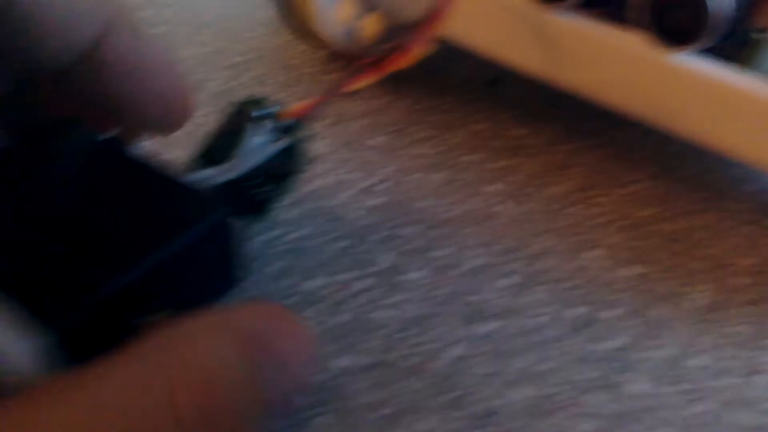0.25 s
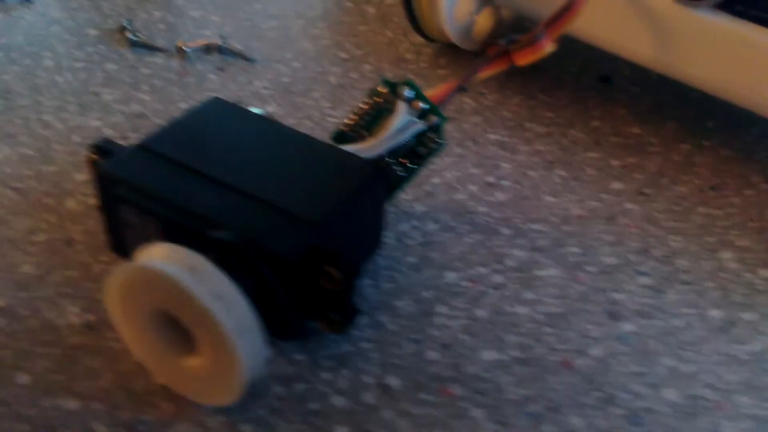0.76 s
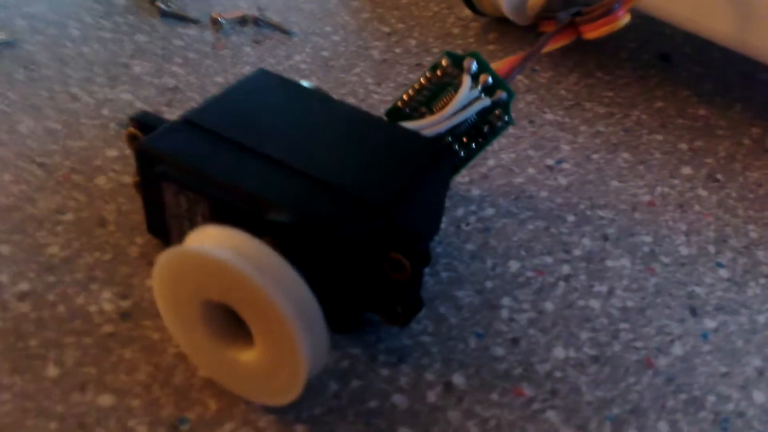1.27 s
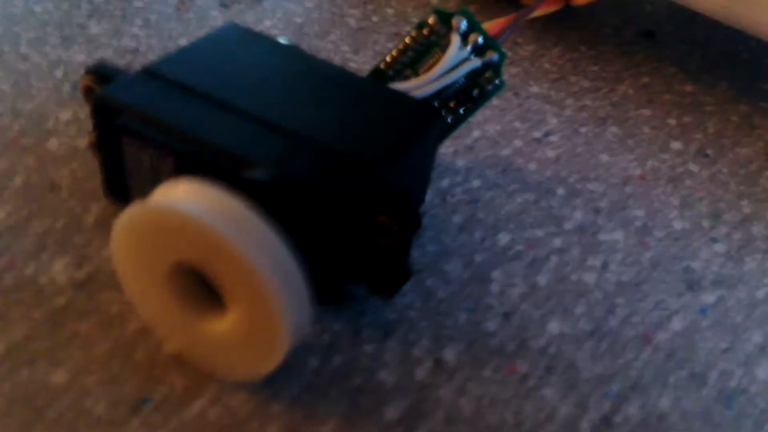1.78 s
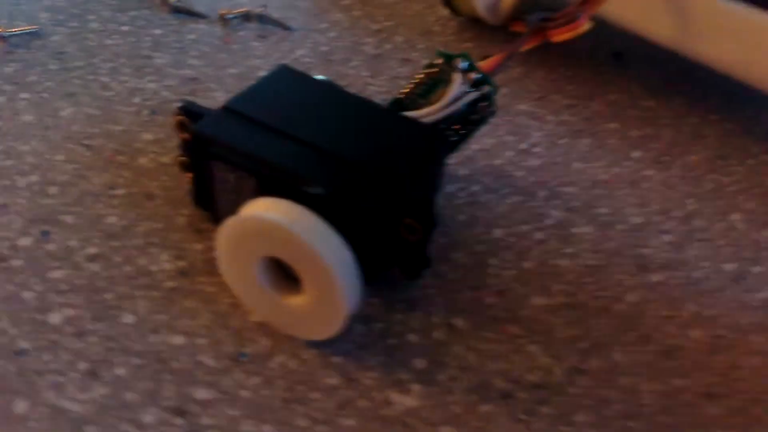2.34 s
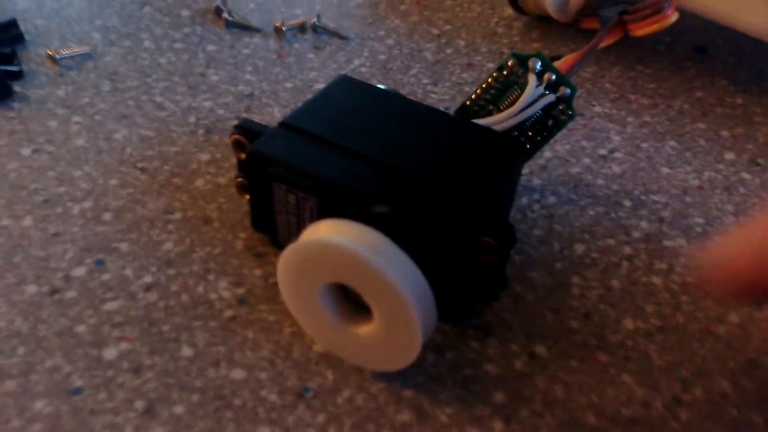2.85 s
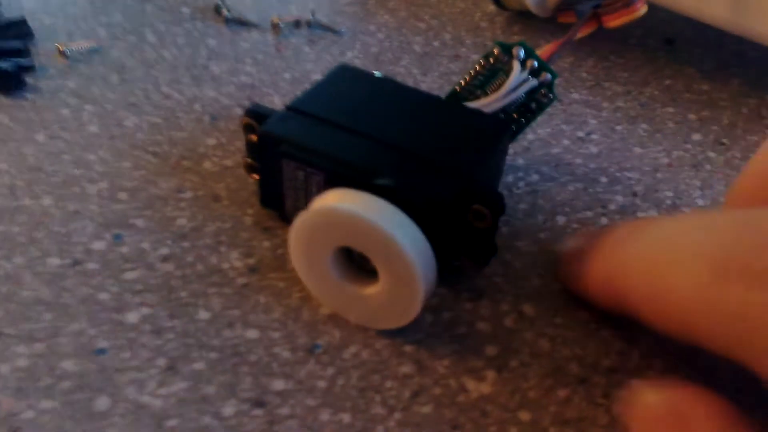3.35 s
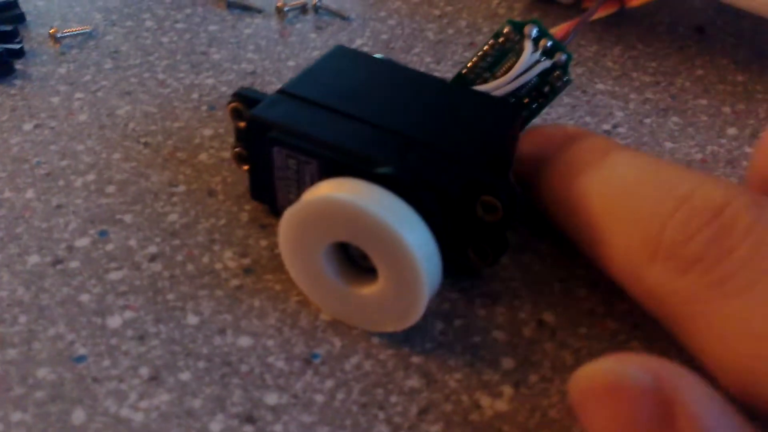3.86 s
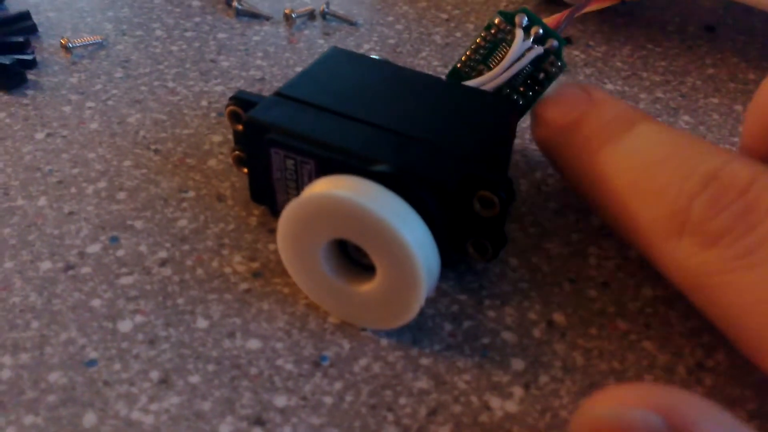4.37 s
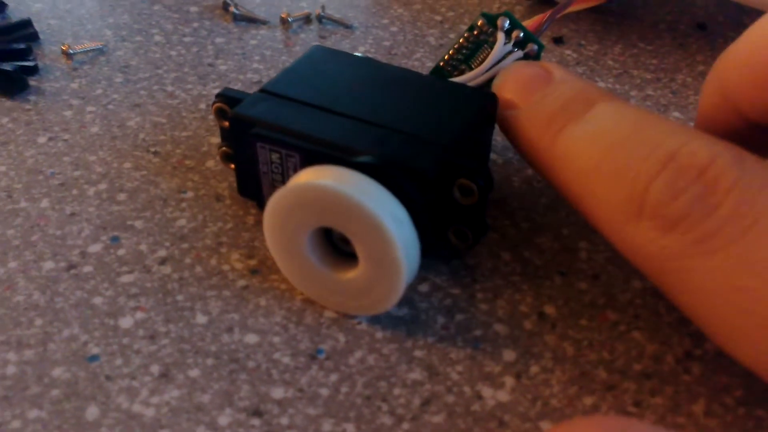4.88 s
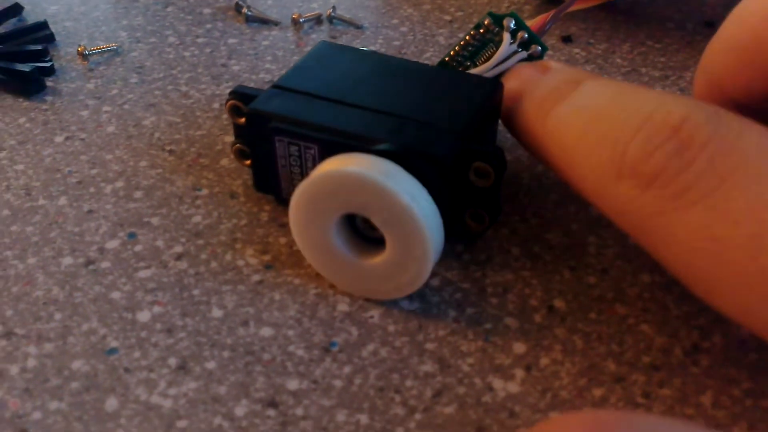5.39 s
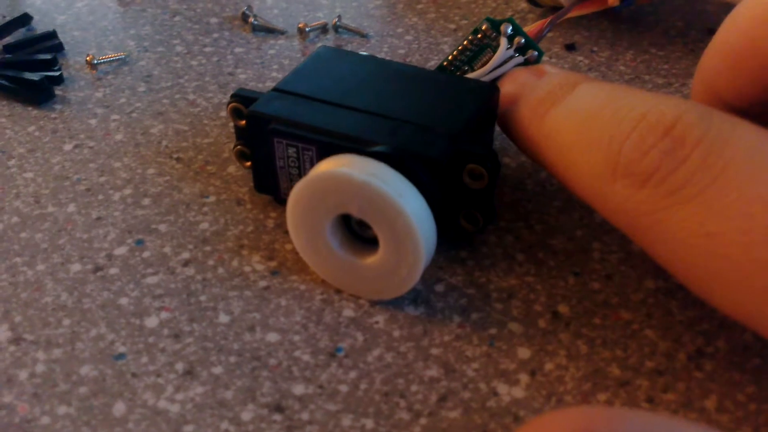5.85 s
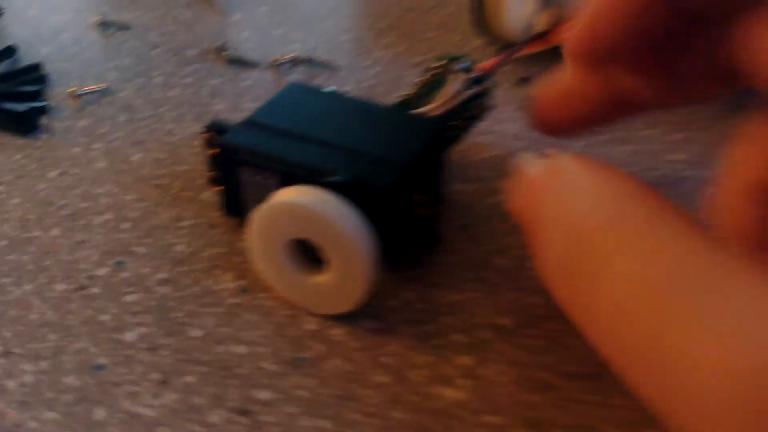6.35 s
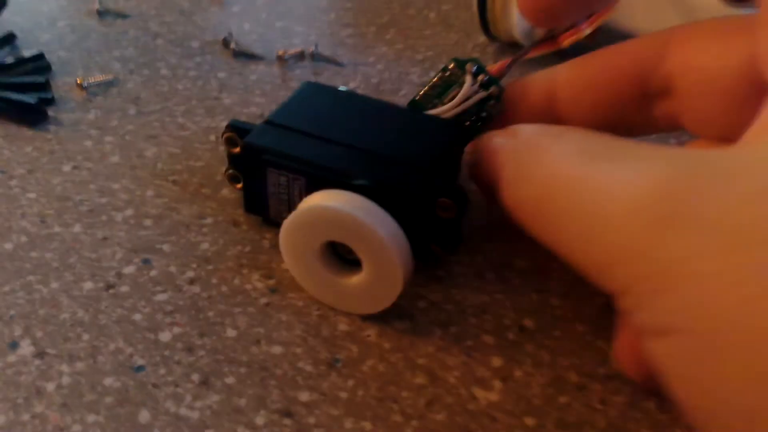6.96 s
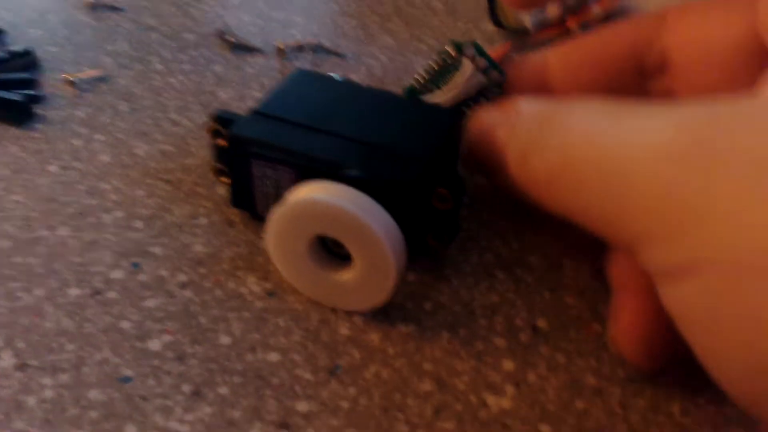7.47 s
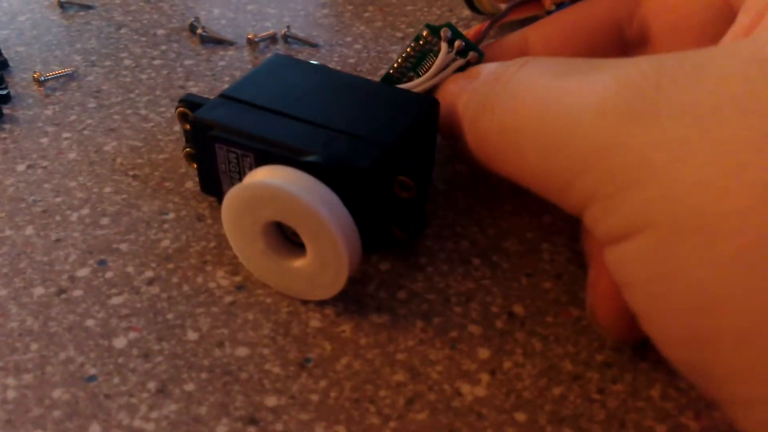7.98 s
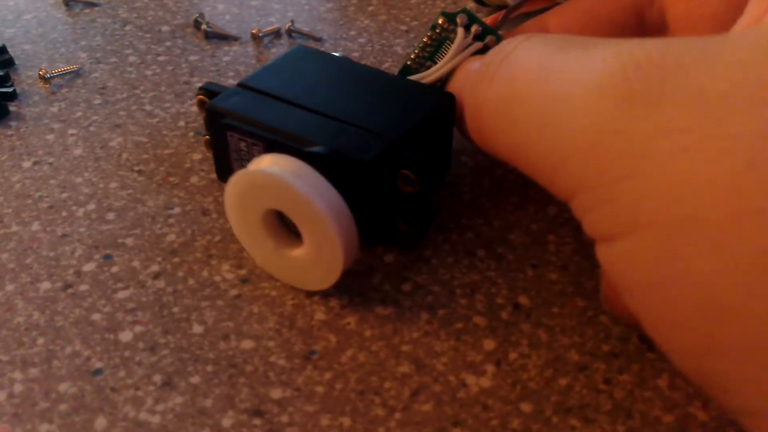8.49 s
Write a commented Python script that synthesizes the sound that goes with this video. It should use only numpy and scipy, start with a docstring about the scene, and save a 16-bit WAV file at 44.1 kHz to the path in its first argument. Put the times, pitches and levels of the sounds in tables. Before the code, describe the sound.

From the start a small hobby servo runs very close by: a loud metallic rattle and gritty grind, with hard irregular clacks, over a bright, hissy whine made of hundreds of tooth ticks a second. An off-centre gear makes it throb about twelve times a second. Clacks are densest from 0.4 to 1.1 seconds. Soft knocks come near 1.3 and 1.8, then bumps and scuffs from 2.0 lead to a sharp double click at 2.14. The loud rattle drops at once. A lighter, fluttering ticking whirr continues, mostly slowing to about seven pulses a second. Small snaps stand out near 3.8, 5.8, 6.5 and 8.0. Soft finger touches land around 4.5 and 6.4, with faint scuffs to 6.7 and near 8.0; the case sings slightly under pressure, strongest around 7. Faint bench murmur, short dry reflections, still running at 8.7.

```python
"""A loud metallic rattle and grind over a bright ticking whine: a small geared servo on a bench, mostly slowing.
Meshing teeth tick hundreds of times a second; an off-centre gear binds once a turn, so the whine swells and sags.
Loose teeth strike and ring the case, whose modes slide with the strain; bumps and a sharp click end the loud rattle.
A lighter rattle follows, with snapping teeth, finger touches and scuffs, over motor whirr, bench murmur and hum.
Strikes are noise bursts through resonators; steady sounds are filtered noise or sines, with short echoes added."""
import sys
import numpy as np
from scipy import signal
from scipy.fft import rfft, irfft, next_fast_len
from scipy.io import wavfile
from scipy.ndimage import uniform_filter1d

SR = 44100
rng = np.random.default_rng(int(sys.argv[2]) if len(sys.argv) > 2 else 0)


def generate_wav(signal):
    """Clip the signal to [-1, 1] and save it as 16-bit WAV at the path in sys.argv[1]."""
    frames = np.transpose(np.atleast_2d(signal))
    scaled = np.clip(frames, -1, 1) * 32767
    pcm = np.round(scaled).astype(np.int16)
    wavfile.write(sys.argv[1], SR, pcm)


N = 384993
TIME = np.arange(N) / SR

# Levels in the tables are relative unless said otherwise; pan is left minus right.
# steady hum in the room: pitch_hz, level_db
HUM = [(88.3, -90), (220.7, -82), (397, -84.5), (543.7, -83.5), (899, -83.5)]
# colour of the murmur in bench and room: frequency_hz, level_db
ROOM = [(24, -48), (40, -30), (59, -45), (80, -7), (166, -5.5), (216, -3), (267, -1), (402, 0.5),
        (466, -2.5), (531, 1.5), (749, -5), (897, -0.5), (1150, -14.5), (2000, -24), (2600, -40),
        (4400, -120)]
# faint drone of the bench: pitch_hz, width_hz, level_db
DRONE_MODES = [(221.3, 11.5, -0.5), (404, 31, -3.5), (607, 120, -8.5), (890, 15, -3), (1301, 34, -3),
               (1765, 21, -9)]
BENCH_DB, BENCH_WAVER_DB = -66.5, 2
# colour of the motor whirr: frequency_hz, level_db
WHIRR = [(500, -16), (1200, -6.5), (1800, -9), (2350, -1), (2900, -3), (3400, -7), (4200, -6.5),
         (6000, -10), (12000, -55.5)]
WHIRR_DB, WHIRR_FADE_DB_PER_S, WHIRR_SWELL_DB = -60, 0.43, 3.5

# a fingertip lands: start_s, level_db, decay_s
TOUCHES = [(4.461, -51, 0.014), (4.584, -59.5, 0.022), (6.445, -56, 0.024)]
# the servo knocking on the bench: pitch_hz, width_hz, level_db
TOUCH_MODES = [(210, 70, 2), (410, 130, 1), (605, 120, -3.5), (888, 46, 6), (1290, 110, -2),
               (1710, 300, -14)]
# handling bumps: start_s, level_db, pitch_hz, rise_cycles
BUMPS = [(1.234, -41.5, 530, 0.21), (1.364, -46, 380, 0.33), (1.783, -36, 540, 0.62),
         (1.822, -37.5, 170, 0.34), (2.015, -40, 700, 0.28), (2.057, -35, 925, 0.22),
         (2.06, -46, 218, 0.44), (2.0724, -37.5, 200, 0.23), (2.1385, -29, 560, 0.48),
         (2.14, -36, 302, 0.4), (2.143, -46.5, 135, 0.5)]
BUMP_LOW_CUT_HZ = 90
# plastic scuffs: start_s, level_db, decay_s
SCUFFS = [(2.0561, -36, .0014), (2.071, -40.5, 0.0033), (2.104, -44, 0.019), (2.124, -42, 0.0045),
          (2.131, -35.5, 0.0025), (2.136, -28.5, 0.0021), (6.423, -48, 0.0037), (6.458, -54, 0.0073),
          (6.722, -52, 0.012), (7.986, -51, 0.0036)]
# colour of scuffed plastic: frequency_hz, level_db
PLASTIC = [(60, -25), (250, 0), (450, 10), (650, 1), (1000, 3), (1400, 1.5), (2000, -3), (3000, 0),
           (4200, -2), (5500, 3), (8000, -5), (15000, -31)]
# the slip clicks home in a double crack: start_s, level_db
CRACKS = [(2.1372, -16.5), (2.1387, -13.5)]
# the cracking plastic: pitch_hz, width_hz, level_db
CRACK_MODES = [(497, 180, -2), (800, 260, -1.5), (1400, 430, 1.5), (2120, 500, -2.5), (3240, 500, -6),
               (4280, 580, 7.5), (5500, 1300, 4), (7300, 1500, -2)]

TEETH = 47
FIRST_TIGHT_TURNS = .154
# speed of the off-centre gear: time_s, speed_turns_per_s
SPEED = [(0, 12.825), (1.4, 10.834), (4.5, 8.962), (4.9, 8.296), (7.4, 7.319), (7.6, 7.86), (8.73, 7.319)]
# force on the teeth: time_s, tight_spot_level_db, slack_side_drop_db
LOAD = [(0, -45.5, 5.5), (.41, -46, 6), (.7, -51, 7), (.95, -44.5, 5.5), (1.42, -55.5, -0.5),
        (1.68, -43, 8), (2.4, -42, 6.5), (3.0, -42.5, 3), (3.8, -41, 8), (4.05, -45, 5.5), (4.3, -43.5, 6),
        (5.6, -45, 6.5), (6.2, -48, 5.5), (6.58, -54.5, 1), (6.9, -50.5, 2.5), (7.5, -52, -1),
        (7.63, -50.5, 2), (7.9, -42.5, 17), (8.15, -49.5, 7), (8.4, -52, 3.5), (8.73, -54, 2)]
# rattle of the loose teeth at the tight spot, which drops at the click: time_s, level_db
LOOSENESS = [(0, -35), (.25, -37), (.42, -35.5), (.9, -35.5), (1.2, -34.5), (1.75, -36), (2.12, -38),
             (2.2, -47.5), (2.7, -50), (3.05, -46.5), (3.85, -48.5), (4.1, -50.5), (5.9, -51), (6.35, -54),
             (6.6, -49.5), (7.3, -48), (7.95, -50.5), (8.5, -52.5)]
# brief grinding swells added to the rattle: centre_s, half_length_s, rise_db
GRINDS = [(0.335, 0.041, 4.5), (0.41, 0.016, 7.5), (0.667, 0.019, 6.5), (0.74, 0.015, 2.5),
          (0.925, 0.031, 3.5), (1.345, 0.025, 2), (1.65, 0.012, 4.5), (1.835, 0.016, 2), (2.425, 0.035, 2),
          (2.98, 0.03, 3), (3.085, 0.025, 3), (3.84, 0.016, 4), (4.25, 0.033, 2), (4.38, 0.022, 1),
          (4.48, 0.025, 4), (6.07, 0.02, 5), (6.19, 0.013, 4), (6.335, 0.043, 8.5), (6.46, 0.03, 6),
          (6.56, .02, 3), (6.715, .025, 1.5), (6.835, .03, 3.5), (6.985, 0.026, 2), (7.14, .015, 0),
          (7.25, 0.027, -1), (7.635, 0.02, 5.5), (7.78, 0.022, 4.5), (7.915, 0.024, 7), (8.045, .02, 3),
          (8.195, 0.021, 5)]
# tone of the gears: time_s, mesh_sheen_db, upper_case_mode_db
TONE = [(0, 4, -7), (.5, 3.5, -29), (1.3, 1, -8.5), (2.15, -5, -5), (3.3, -3, -20), (3.9, -5, -6),
        (4.5, -5, -4), (5.2, -5, -27), (7.3, -1, -13), (8.4, -7, -13)]
# where the servo sits as the microphone shifts: time_s, rattle_pan_db
PLACE = [(0, -6), (1.1, -8), (2.0, -6), (3.0, -9), (4.5, -10), (6.0, -7), (6.55, 1), (7.3, -1), (8.73, 0)]
# fingers press on the case: centre_s, half_length_s, firmness (0-1)
GRIPS = [(4.6, 0.61, 0.4), (5.6, 0.96, 0.58), (6.5, 0.31, 0.66), (7.1, 0.43, 1)]
RATTLE_EASE_DB = 2.5   # drop on the slack side
SETTLED_RATTLE_DB = -55   # upper limit on the rattle curve that sets the light snaps
MESH_BIND_POWER, RATTLE_BIND_POWER = 1.83, 1.3   # the higher, the briefer the tight spot
MESH_PAN_DB, MESH_PAN_GRIP_DB = 12.5, 4   # the mesh sits left, more so under the fingers

# colour of the mesh: frequency_hz, level_db
MESH = [(1000, -28), (3500, -22), (5500, -9.5), (7800, -8), (9000, -3.5), (10150, -1), (11000, -1),
        (12300, -0.5), (13300, -9), (14500, -2.5), (16000, -22)]
# two drifting resonances of the whine: time_s, lower_pitch_hz, upper_pitch_hz
WHINE_PEAKS = [(0, 10000, 11750), (1, 10000, 12150), (2.6, 9900, 12250), (3.4, 10000, 12350),
               (4.3, 10300, 12000), (5.3, 10550, 11750), (6.8, 10950, 12200), (7.9, 11500, 12100),
               (8.73, 10400, 11700)]
WHINE_WIDTH_HZ, WHINE_PEAK_DB = 1000, -4.5
# ring of the gear case: pitch_hz, width_hz, level_db
CASE_MODES = [(4320, 530, -16.5), (4720, 460, -9), (5064, 368, -4), (5730, 540, -5.5), (6520, 920, -4),
              (7150, 450, 3), (7620, 500, -5.5), (8550, 640, -13.5), (10000, 680, -26), (12000, 5600, -30)]
# strain bends the case modes: time_s, low_bend_semitones, high_bend_semitones, high_level_db
CASE_BEND = [(0, -0.8, 0.16, -1), (0.28, -0.88, 0.24, 0.5), (0.38, -0.2, -0.28, -3.5),
             (1.1, -0.22, 0.088, -1), (1.55, 0, 0.14, -0.5), (1.9, 0.2, 0.5, -4), (2.13, -0.074, 0.39, 1)]
CASE_SPLIT_HZ = 6200   # modes above this belong to the high group
# extra upper ring of the rattle: pitch_hz, width_hz, level_db
UPPER_MODES = [(7750, 880, 5), (9030, 800, -33)]
# colour of the lighter rattle once the servo has settled: frequency_hz, level_db
LIGHT_RATTLE = [(2000, -19), (3800, -20), (4300, -14.5), (4750, -4), (5150, -7), (5600, -2), (6300, -5.5),
                (7100, 0), (7700, -7.5), (8500, -11.5), (12000, -8.5), (16000, -20)]
# hardest clacks of loose teeth across their backlash: start_s, level_db
CLACKS = [(0.0144, -37), (0.0363, -29), (0.0677, -26), (0.1013, -22), (0.1336, -28), (0.1625, -25),
          (0.2149, -31), (0.2349, -32), (0.3007, -34), (0.3716, -18), (0.3978, -20), (0.4449, -27),
          (0.4703, -32), (0.4898, -21), (0.5137, -22), (0.5365, -19.5), (0.5586, -30), (0.5646, -24),
          (0.5813, -18), (0.611, -19), (0.6365, -23), (0.6489, -23), (0.6664, -22), (0.7043, -26),
          (0.7158, -23), (0.7352, -23), (0.7577, -19), (0.7836, -29), (0.8111, -33), (0.8629, -25),
          (0.8934, -27), (0.9103, -24), (0.9792, -22), (0.9966, -20), (1.0535, -31), (1.076, -30),
          (1.0875, -28), (1.1084, -35), (1.1328, -30), (1.1667, -28), (1.1892, -27), (1.2131, -29),
          (1.2775, -22), (1.3324, -20), (1.3755, -24), (1.3927, -24), (1.4282, -32), (1.4526, -28),
          (1.4731, -30), (1.509, -25), (1.5314, -28), (1.5923, -30), (1.6043, -28), (1.6247, -21),
          (1.6501, -24), (1.6876, -28), (1.7636, -26), (1.8103, -28), (1.8417, -27), (1.8861, -35),
          (1.8976, -30), (1.9225, -23.5), (1.9774, -31), (2.0009, -33), (2.0467, -34), (2.0692, -29),
          (2.1031, -28)]
# single teeth that catch and snap free: start_s, level_db
SNAPS = [(2.1577, -25), (2.4124, -33), (2.452, -34), (2.7824, -32), (2.9504, -39), (3.0204, -33),
         (3.0884, -40), (3.1326, -37), (3.216, -38), (3.2355, -35), (3.832, -29), (3.9444, -34),
         (4.561, -31), (4.8239, -36), (5.6675, -35), (5.771, -23), (6.0551, -36), (6.187, -32),
         (6.1908, -31), (6.2731, -38), (6.304, -39), (6.537, -26.5), (6.568, -33), (6.7226, -37),
         (6.8284, -30.5), (6.8587, -38), (6.9258, -33), (6.971, -32), (7.232, -30), (7.416, -31),
         (7.7885, -36), (7.881, -31), (7.9818, -29), (8.007, -33), (8.0306, -25), (8.057, -34),
         (8.088, -36), (8.1167, -30.5), (8.247, -37)]
# ring of a snap: pitch_hz, width_hz, level_db
SNAP_MODES = [(2380, 1140, -11.5), (4820, 400, -2.5), (5520, 760, -1.5), (7000, 570, 5.5),
              (8200, 1000, 1.5), (9030, 700, 1), (10300, 1500, -1), (12800, 4200, -12)]
# finger pressure bends the singing mode of the case: time_s, pitch_hz
SINGING_PITCH = [(5.2, 7100), (6.3, 6920), (6.45, 7100), (6.57, 7300), (6.85, 7100), (7.0, 7050),
                 (7.4, 7050)]
SINGING_GRIP_DB, SINGING_WIDTH_HZ = -52, 320   # level for firmness 1 at the tight spot, without grinding
SINGING_GRIND_SHARE = 0.73   # share of each grinding swell
# modes that ring for a while as the hold shifts:
# centre_s, half_length_s, pitch_hz, slide_hz_per_s, width_hz, level_db, pan_db
PASSING_RINGS = [(0.12, 0.17, 4840, 400, 190, -47, -9), (1.8, 0.36, 8000, 300, 1200, -50, 3),
                 (0.39, 0.056, 5900, 2500, 260, -52, -8), (1, 0.6, 8850, 300, 600, -57, 17),
                 (2.76, 0.94, 2360, 0, 410, -66, 14), (3.3, 0.5, 5560, 200, 400, -60, -5),
                 (5.4, 0.6, 10700, 0, 900, -58, 6), (4, 0.51, 7750, -300, 400, -58.5, 13),
                 (3.7, 0.55, 6600, 300, 480, -55, -10), (5.46, 0.6, 6000, 0, 550, -60.5, 2),
                 (8.26, 0.92, 2480, 0, 420, -63.5, 13.5), (8.06, 0.6, 5300, 0, 240, -63, 0),
                 (7.85, 0.22, 11900, 0, 450, -65, 6), (8.42, 0.3, 11180, -200, 170, -61.5, 8),
                 (8.4, 0.5, 7900, 0, 400, -65, 7), (8.3, 0.5, 4670, 0, 320, -63, -1)]
# a treble hollow slides as the microphone moves: time_s, centre_hz, depth (0-1)
HOLLOW = [(2.1, 5900, 0.63), (2.3, 6100, 0.8), (2.85, 6400, .7), (3.3, 6450, .3), (4.2, 6800, 0.7),
          (5.6, 6600, 0.3), (6.3, 6600, 0.04), (7.7, 7100, 0.6), (8.4, 7150, 0.6)]


def from_db(db):
    """Decibels express amplitude ratios logarithmically: 20 dB is a factor of ten."""
    return np.exp(np.asarray(db) * (np.log(10) / 20))


def rms_one(x):
    """Normalisation: mean power becomes 1."""
    return x / np.sqrt(np.mean(x ** 2) + 1e-20)


def in_time(rows):
    """Linear interpolation: each column of a curve at every sample."""
    s, *columns = np.transpose(rows)
    return [np.interp(TIME, s, c) for c in columns]


def swells(table):
    """Superposition of Gaussian rises, one for each row (centre, half length, height)."""
    t = TIME[::40]   # a coarse grid suffices for slow curves
    total = sum(height * np.exp(-np.minimum(((t - s) / half) ** 2, 20)) for s, half, height in table)
    return np.interp(TIME, t, total)


def drift(rate):
    """Slow random modulation of unit rms, interpolated between knots at the given rate per second."""
    knots = rng.standard_normal(int(TIME[-1] * rate) + 2)
    return rms_one(np.interp(TIME * rate, np.arange(len(knots)), knots))


def dying(table):
    """Exponential decay: sudden starts that die away, one for each row (start, level, decay)."""
    out, t = np.zeros(N), TIME[:SR // 4]
    for s, db, decay in table:
        start = int(s * SR)
        out[start:start + len(t)] += from_db(db) * np.exp(-t / decay)
    return out


def colour(x, spectrum, size=4096):
    """Minimum-phase filtering: a causal response of unit power gain is made from a spectrum by its cepstrum."""
    hz, db = np.transpose(spectrum)
    grid = np.arange(size // 2 + 1) * SR / size + 1
    cepstrum = irfft(np.log(from_db(np.interp(np.log(grid), np.log(hz), db))))
    cepstrum[1:size // 2] *= 2   # fold onto positive time
    cepstrum[size // 2 + 1:] = 0
    kernel = irfft(np.exp(rfft(cepstrum)))
    kernel /= np.linalg.norm(kernel)
    return np.apply_along_axis(signal.oaconvolve, -1, x, kernel)[..., :N]


def ring(x, modes):
    """Modal superposition: damped two-pole resonances in parallel, with alternating signs."""
    out, push = 0, signal.lfilter([1, 0, -1], [1], x) + 1e-18
    for k, (hz, width, db) in enumerate(modes):
        r = np.exp(-np.pi * width / SR)
        gain = (-1) ** k * from_db(db) * (1 - r * r) / 2
        out = out + signal.lfilter([gain], [1, -2 * r * np.cos(2 * np.pi * hz / SR), r * r], push)
    return out


def gliding(x, hz, width, size=1024):
    """Resonance with a moving centre: one mode of unit peak gain, retuned block by block."""
    r, x = np.exp(-np.pi * width / SR), np.atleast_2d(x) + 1e-18
    out, state = np.zeros_like(x), np.zeros((len(x), 2))
    b = np.array([1, 0, -1]) * (1 - r * r) / 2
    for i in range(0, x.shape[1], size):
        a = [1, -2 * r * np.cos(2 * np.pi * hz[i] / SR), r * r]
        out[:, i:i + size], state = signal.lfilter(b, a, x[:, i:i + size], zi=state)
    return out


def impulses(times, sizes):
    """Impulsive excitation: unit-sample strikes at the given times."""
    return np.bincount(np.clip(np.round(times * SR), 0, N - 1).astype(int), sizes, N)


def contact(strikes, decay_s, apart=0.91):
    """Frictional contact: each strike is a decaying noise burst, partly independent at the two ports."""
    shared, *own = rng.standard_normal((3, N))
    envelope = signal.lfilter([1], [1, -np.exp(-1 / (decay_s * SR))], strikes + 1e-18)
    return envelope * (shared + apart * np.array(own))


def hard_hits(table, modes, rebound, rebound_s, count=4):
    """Restitution: each hit chatters in fading bounces, scaled by the peak of the modes' impulse response."""
    s, db = np.transpose(table)
    gaps = rebound_s * (.5 + rng.random((len(s), count)))
    times = s[:, None] + np.cumsum(gaps, axis=1) - gaps[:, :1]
    sizes = from_db(db)[:, None] * np.clip(rebound, 0, .95) ** np.arange(count)
    mode_peak = np.abs(ring(signal.unit_impulse(SR // 100), modes)).max()
    return impulses(times.ravel(), sizes.ravel()) / mode_peak


def evened(x, span_s):
    """Gain control: hold the running rms of both ports near 1, keeping the single ticks."""
    span = int(span_s * SR)
    power = uniform_filter1d(uniform_filter1d(np.mean(x ** 2, axis=0), span), span)
    return x / np.sqrt(np.abs(power) + 1e-12)


def ports(x, pan_db, lag_ms):
    """Interaural-style cues: the two ports differ in level, and the left one hears slightly later."""
    left, right = np.broadcast_to(x, (2, N))
    size = next_fast_len(N + SR // 10, real=True)
    hz = np.arange(size // 2 + 1) / size * SR
    left = irfft(rfft(left, size) * np.exp(-2j * np.pi * hz * lag_ms / 1000), size)[:N]
    panned = np.array([left * from_db(pan_db / 2), right * from_db(-pan_db / 2)])
    return panned / np.sqrt((from_db(pan_db) + from_db(-pan_db)) / 2)   # constant power


def hum(waver, flutter_db):
    """Frequency and amplitude modulation: faint tones that waver a little in pitch and level."""
    out = 0
    for hz, db in HUM:
        level = from_db(db + flutter_db * drift(7)) * np.sqrt(2)
        cycles = hz * np.cumsum(1 + waver * drift(9)) / SR
        out = out + level * np.sin(2 * np.pi * cycles)
    return out * from_db([[-2], [2]])


def background(spectrum, apart):
    """Partial coherence: coloured noise, partly shared by the ports."""
    shared, left, right = [colour(rng.standard_normal(N), spectrum) for _ in range(3)]
    return rms_one(shared + apart * np.array([left, right]))


def bench_murmur():
    """Structure-borne sound: soft noise and lightly damped modes form a low murmur in bench and room."""
    push = rng.standard_normal(N) + 0.57 * rng.standard_normal((2, N))
    drone = from_db(-7.0) * rms_one(ring(push, DRONE_MODES))
    level = from_db(BENCH_DB + BENCH_WAVER_DB * drift(16))
    return level * (background(ROOM, apart=0.74) + drone)


def reflections(x, t60, wet_db):
    """Reverberation: dense echoes, different at each port, decay by 60 dB in t60 seconds."""
    t = TIME[:SR // 2]
    tails = rng.standard_normal((2, len(t))) * from_db(-60 * t / t60) * (t > .001)
    tails /= np.linalg.norm(tails, axis=1, keepdims=True)
    return from_db(wet_db) * signal.oaconvolve(x, tails, axes=1)[:, :N]


def motor_whirr(tight):
    """Amplitude modulation: coloured motor noise fades slowly and swells at each tight spot."""
    level_db = WHIRR_DB - WHIRR_FADE_DB_PER_S * TIME + WHIRR_SWELL_DB * (tight - .5)
    return from_db(level_db) * background(WHIRR, apart=1.0)


def touches():
    """Forced resonance: a landing fingertip's noise burst sets the servo knocking softly on the bench."""
    push = dying(TOUCHES) * rng.choice([-1, 1], N)
    mode_energy = np.linalg.norm(ring(signal.unit_impulse(SR // 10), TOUCH_MODES))
    return ring(push, TOUCH_MODES) / mode_energy


def bumps():
    """Damped oscillation: soft knocks whose envelopes swell and die within a few cycles."""
    out, t = np.zeros(N), TIME[:SR // 10]
    for s, db, hz, cycles in BUMPS:
        age, start = t * hz / cycles, int(s * SR)
        out[start:start + len(t)] += from_db(db) * age * np.exp(1 - age) * np.sin(2 * np.pi * hz * t)
    high_pass = signal.butter(3, BUMP_LOW_CUT_HZ, "high", fs=SR, output="sos")
    return signal.sosfilt(high_pass, out + 1e-18)


def scuffs():
    """Dry friction: short gritty scuffs of plastic are saturated, coloured noise."""
    noise = rng.standard_normal(N) + .5 * rng.standard_normal((2, N))
    grit = rms_one(colour(noise, PLASTIC))
    return uniform_filter1d(dying(SCUFFS), size=8) * rms_one(np.tanh(grit))


def sharp_click():
    """Impulse response: a double crack excites the modes of the plastic."""
    return ring(hard_hits(CRACKS, CRACK_MODES, rebound=0.18, rebound_s=0.00027), CRACK_MODES)


def handling():
    """Superposition of bumps, touches, scuffs and the sharp click, all nearer the right port."""
    click = from_db(-2.0) * sharp_click()
    return (ports(bumps(), -12.5, lag_ms=0.16) + ports(touches(), -1, lag_ms=0.05)
            + ports(from_db(0.5) * scuffs() + click, -11.0, lag_ms=0.067))


def gear_motion(sag, wander):
    """Eccentric gearing: gives tightness (0-1) and every tooth's instant; speed falls through each tight spot."""
    turns_per_s, = in_time(SPEED)
    turn = np.cumsum(turns_per_s) / SR - FIRST_TIGHT_TURNS
    tooth_rate = TEETH * turns_per_s * (1 - sag * np.sin(2 * np.pi * turn) + wander * drift(60))
    teeth_passed = np.floor(np.cumsum(tooth_rate) / SR)
    teeth = np.flatnonzero(np.diff(teeth_passed)) / SR
    return (1 + np.cos(2 * np.pi * turn)) / 2, teeth


def hollowed(x, width_hz):
    """Spectral notch by subtraction: a sliding hollow in the treble at the left port."""
    hz, depth = in_time(HOLLOW)
    left = x[0] - np.clip(depth, 0, 1) * gliding(x[0], hz, width_hz)[0]
    return np.array([left, x[1]])


def passing_rings(teeth, tight, swell_db):
    """Selective resonance: tooth strikes keep narrow modes ringing while the hold on the case favours them."""
    drive, out = contact(impulses(teeth, np.ones(len(teeth))), 0.00057), np.zeros((2, N))
    for s, half, hz, slide, width, db, pan_db in PASSING_RINGS:
        span = slice(*np.searchsorted(TIME, [s - 2 * half, s + 2 * half]))
        t = TIME[span] - s
        mode = rms_one(gliding(drive[:, span], hz + slide * t, width))
        port_gains = from_db([[db + pan_db / 2], [db - pan_db / 2]])
        out[:, span] += mode * np.exp(-(t / half) ** 2) * port_gains
    return out * from_db(swell_db * (tight - 1.5))


def case_singing(teeth, tight, held, grind_db):
    """Driven resonance: under the fingers, tooth strikes make the case sing in one bending mode."""
    singing_hz, = in_time(SINGING_PITCH)
    swell_db = 4.4 * (tight - 1.0) + SINGING_GRIND_SHARE * grind_db
    level = from_db(SINGING_GRIP_DB) * held * from_db(swell_db)
    drive = contact(impulses(teeth, np.ones(len(teeth))), 0.00038)
    return level * rms_one(gliding(drive, singing_hz, SINGING_WIDTH_HZ))


def case_ring(x):
    """Strain-dependent modes: low and high case modes slide in pitch and change in relative strength."""
    low, high, high_db = in_time(CASE_BEND)
    low, high = np.exp2(low / 12), np.exp2(high / 12)   # semitones to ratios
    groups = [0, 0]
    for k, (hz, width, db) in enumerate(CASE_MODES):
        upper = int(hz > CASE_SPLIT_HZ)
        groups[upper] += (-1) ** k * from_db(db) * gliding(x, hz * (high if upper else low), width)
    return groups[0] + from_db(high_db) * groups[1]


def stray_hits(per_s, level_db, spread_db, until_s):
    """Random impacts: harder hits at chance times follow the rattle's strength, as rows (start, level)."""
    when, force = rng.random((int(per_s * until_s), 2)).T
    s = when * until_s
    return np.column_stack([s, np.interp(s, TIME, level_db) + spread_db * (force - .5)])


def backlash_clacks(rattle_db):
    """Backlash impact: loose teeth clack across their play and ring the case until the click."""
    light = stray_hits(per_s=18, level_db=rattle_db, spread_db=7, until_s=CRACKS[0][0])
    hard = from_db(-3.0) * hard_hits(CLACKS, CASE_MODES, rebound=0.88, rebound_s=0.00049)
    light = from_db(-1.5) * hard_hits(light, CASE_MODES, rebound=0.5, rebound_s=0.00031)
    return case_ring(hard + light)


def tooth_snaps(rattle_db):
    """Stick and release: teeth that catch and snap free chatter and excite short modes."""
    level_db = np.minimum(rattle_db, SETTLED_RATTLE_DB)
    light = stray_hits(per_s=24, level_db=level_db, spread_db=3, until_s=TIME[-1])
    hard = from_db(-0.5) * hard_hits(SNAPS, SNAP_MODES, rebound=0.73, rebound_s=.0004)
    light = from_db(16) * hard_hits(light, SNAP_MODES, rebound=0.81, rebound_s=0.0004)
    return ring(hard + light, SNAP_MODES)


def rattle(teeth, upper_db, uneven_db, jitter_s, scrape_s):
    """Impact excitation: loose teeth rebound unevenly and ring the case; after the click the ring is broader."""
    force, late = rng.standard_normal((len(teeth), 2)).T
    sizes = from_db(uneven_db * np.minimum(force, 1.4))
    rebounds = contact(impulses(teeth + jitter_s * late, sizes), scrape_s)
    settled = np.interp(TIME, [2.13, 2.16], [0, 1])   # crossfade at the click
    loud, light = rms_one(case_ring(rebounds)), rms_one(colour(rebounds, LIGHT_RATTLE))
    case = (1 - settled) * loud + settled * light
    upper = rms_one(ring(contact(impulses(teeth, sizes), scrape_s), UPPER_MODES))
    return evened(case + from_db(upper_db) * upper, 0.025)


def mesh(teeth, sheen_db, uneven_db, scrape_s, slide_db, give):
    """Periodic impact and sliding friction: every tooth lands with a bright tick over a steady hiss."""
    strikes = impulses(teeth, from_db(uneven_db * rng.standard_normal(len(teeth))))
    landing = rms_one(contact(strikes, scrape_s, apart=0.68))
    landing = rms_one(np.tanh(landing / give))   # the teeth yield, which evens the ticks
    sliding = rms_one(rng.standard_normal(N) + 0.8 * rng.standard_normal((2, N)))
    ticks = colour(landing + from_db(slide_db) * sliding, MESH)
    whine = sum(gliding(ticks, hz, WHINE_WIDTH_HZ) for hz in in_time(WHINE_PEAKS))
    ticks = ticks + from_db(WHINE_PEAK_DB) * whine
    top = signal.sosfiltfilt(signal.butter(4, 13000, "high", fs=SR, output="sos"), ticks)
    return evened(ticks + (from_db(sheen_db) - 1) * top, 0.048)


def gear_train(tight, teeth):
    """Load modulation: mesh and rattle swell at the tight spot of each turn; teeth also drive clacks and rings."""
    load_db, ease_db = in_time(LOAD)
    loose_db, = in_time(LOOSENESS)
    sheen_db, upper_db = in_time(TONE)
    rattle_pan, = in_time(PLACE)
    held, grind_db = swells(GRIPS), swells(GRINDS)

    mesh_db = load_db - ease_db * (1 - tight ** MESH_BIND_POWER) + 0.52 * drift(9) + 1.2 * drift(55)
    rattle_db = loose_db + grind_db - RATTLE_EASE_DB * (1 - tight ** RATTLE_BIND_POWER)
    rattle_db = rattle_db + 0.67 * drift(16) + 1.0 * drift(110)

    ticks = mesh(teeth, sheen_db, uneven_db=1.0, scrape_s=0.00017, slide_db=-4.5, give=1.9)
    ticks = from_db(mesh_db - 2.02) * ticks
    loose = rattle(teeth, upper_db, uneven_db=5.0, jitter_s=0.00011, scrape_s=0.00034)
    loose = from_db(rattle_db - 4.0) * loose
    singing = case_singing(teeth, tight, held, grind_db)
    case_sound = loose + backlash_clacks(rattle_db) + singing
    return (ports(ticks, MESH_PAN_DB + MESH_PAN_GRIP_DB * held ** 2, lag_ms=0.012)
            + ports(case_sound, rattle_pan, lag_ms=0.026)
            + ports(tooth_snaps(rattle_db), 4.1, lag_ms=0.022)
            + passing_rings(teeth, tight, swell_db=5))


def scene():
    """Superposition of direct sound, its reflections, bench murmur and hum."""
    tight, teeth = gear_motion(sag=.13, wander=.035)
    gears = hollowed(gear_train(tight, teeth), width_hz=740)
    near = motor_whirr(tight) + handling() + gears
    echoes = reflections(near, t60=0.087, wet_db=-8.5)
    return near + echoes + bench_murmur() + hum(waver=0.00404, flutter_db=3)


def record(dry):
    """Band limiting: the deep bass is rolled off and the top is cut steeply."""
    thin = signal.sosfilt(signal.butter(3, 75, "high", fs=SR, output="sos"), dry)
    return signal.sosfilt(signal.ellip(12, .1, 80, 15900, fs=SR, output="sos"), thin)


dry = scene()
out = record(dry)
generate_wav(out)
```